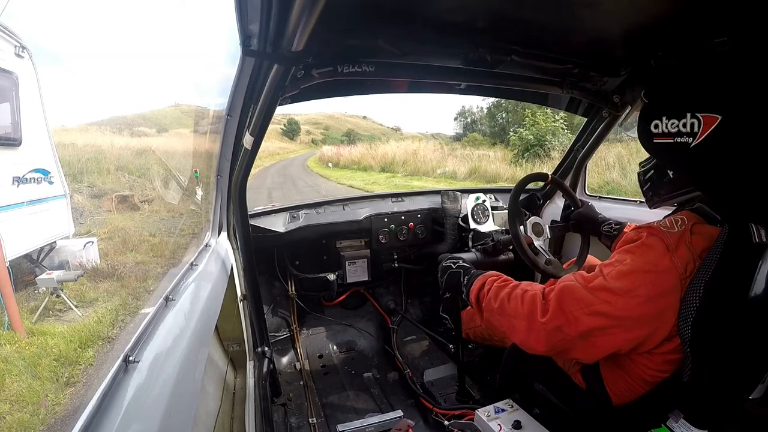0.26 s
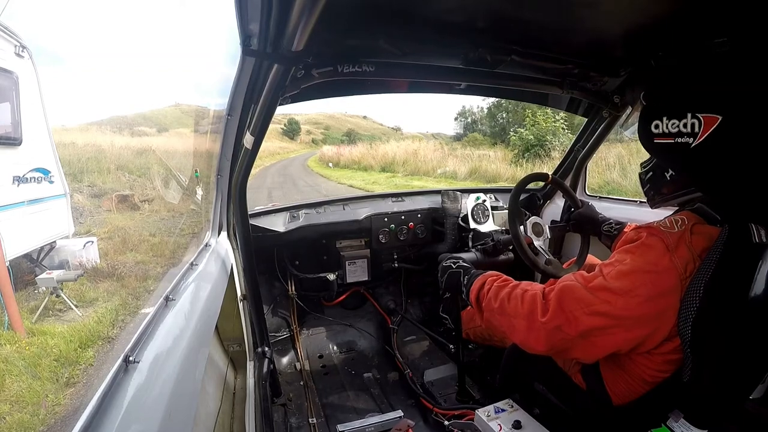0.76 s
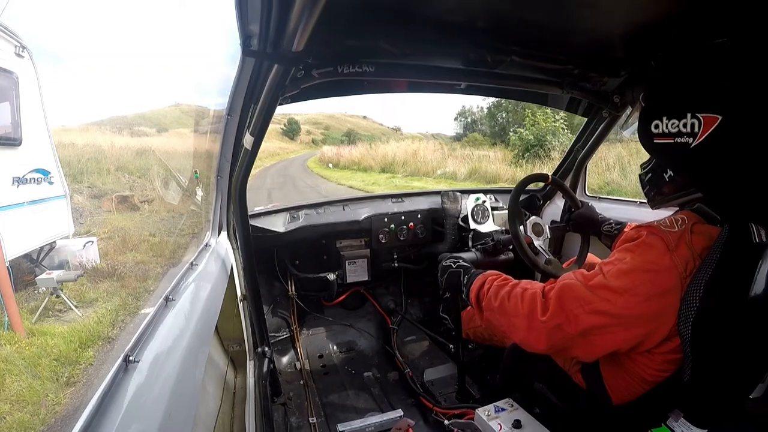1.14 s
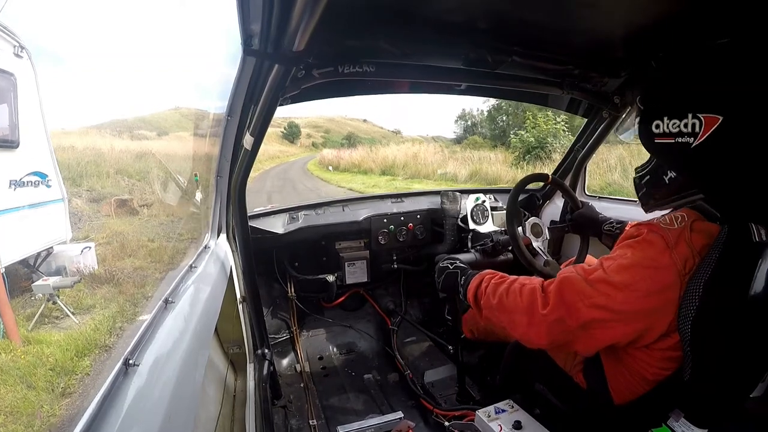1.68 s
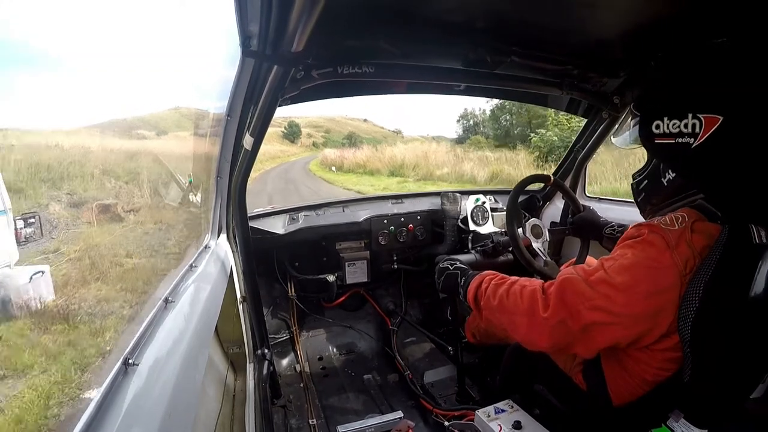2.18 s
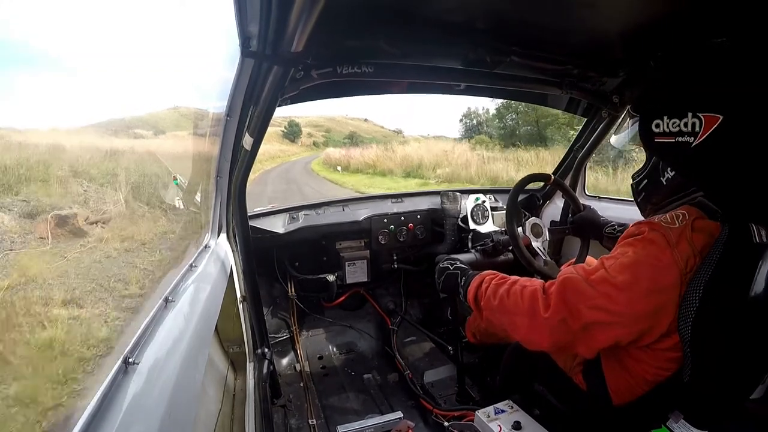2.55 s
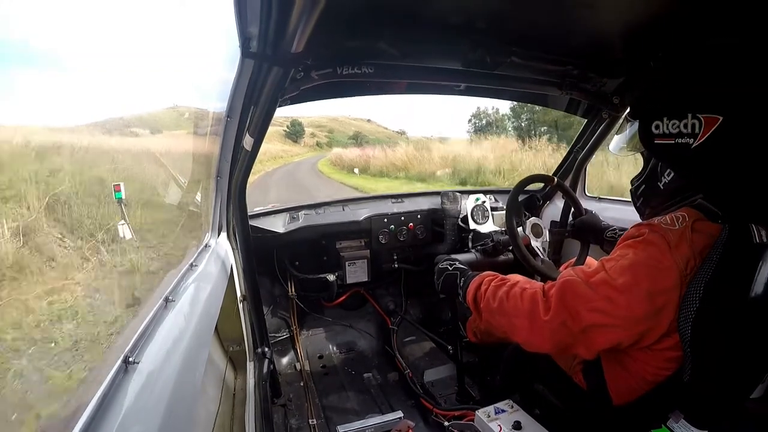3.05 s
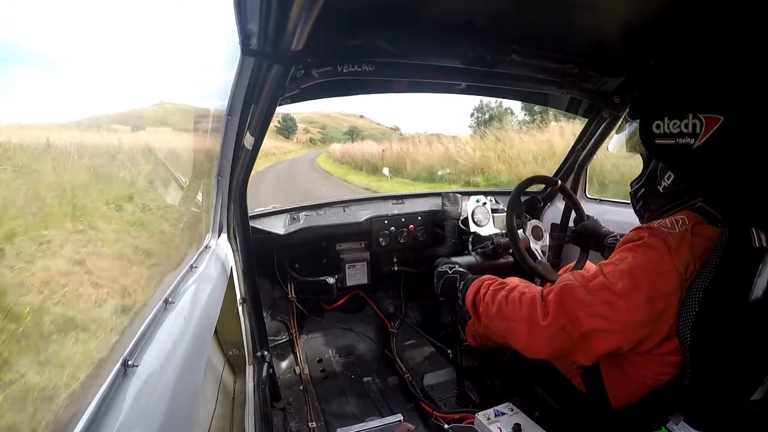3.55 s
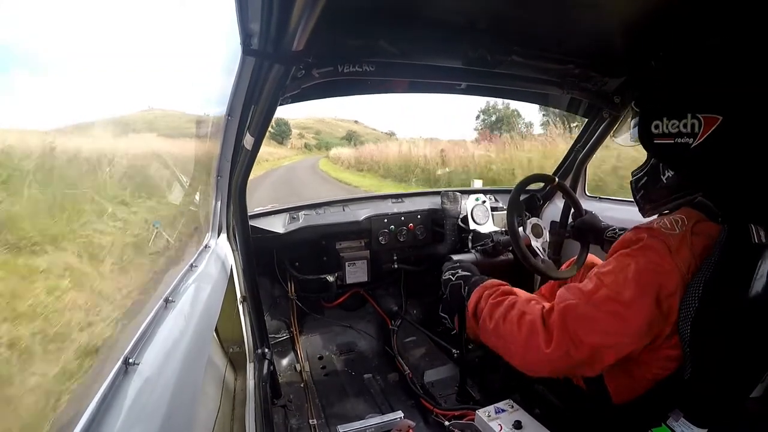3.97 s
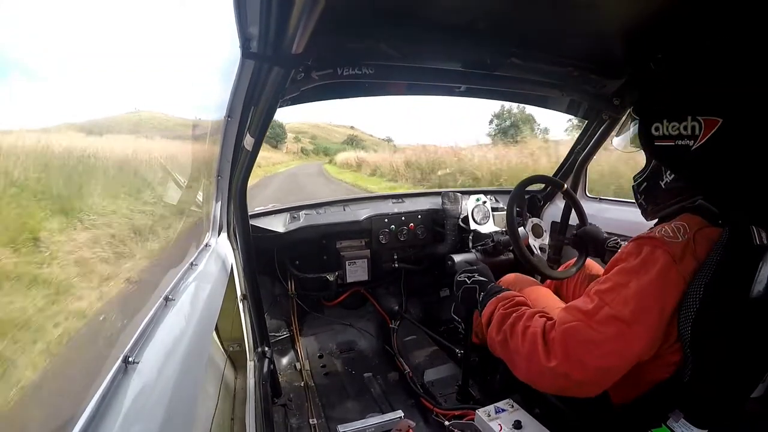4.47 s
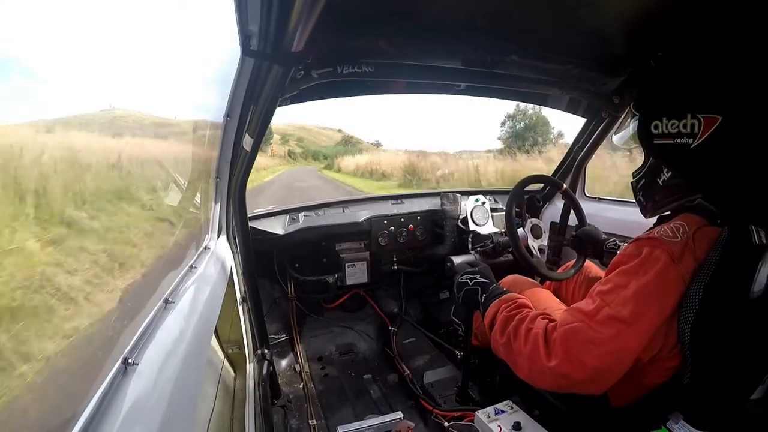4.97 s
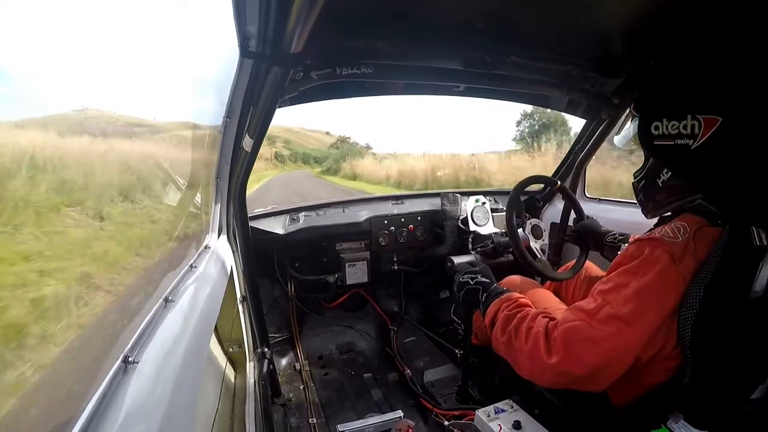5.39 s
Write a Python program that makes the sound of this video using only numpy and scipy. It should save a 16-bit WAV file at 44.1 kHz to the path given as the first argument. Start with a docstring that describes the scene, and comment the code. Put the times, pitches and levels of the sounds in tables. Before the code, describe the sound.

A race car engine revs twice, then launches and accelerates hard through one upshift, booming inside a bare cockpit with a buzzing panel.

```python
"""One microphone inside the bare cockpit of a four-cylinder race car, close to the steel panels.
Standing still, the driver blips the throttle twice and holds a rev; the firing note booms in the cabin
and a loose panel buzzes against the shell in bouts. At 3 s the car launches: the exhaust roar climbs
and the road shakes the body. Just after 4 s the revs fall for one upshift, the sound skips with
a sharp click and short thud, like an edit cut, and the engine pulls again."""
import sys
import numpy as np
from scipy import signal
from scipy.fft import rfft, irfft, next_fast_len
from scipy.io import wavfile
from scipy.ndimage import uniform_filter1d, map_coordinates

SR = 44100
rng = np.random.default_rng(int(sys.argv[2]) if len(sys.argv) > 2 else 0)


def inscribe(sig):
    """Save sig as 16-bit PCM at rate SR to the path in sys.argv[1].

    A 1-D sig is mono; a 2-D sig holds one channel per row.
    Samples are clipped to [-1, 1] before scaling.
    """
    pcm = np.round(np.clip(np.atleast_2d(sig).T, -1, 1) * 32767)
    wavfile.write(sys.argv[1], SR, pcm.astype(np.int16))


N = 248283

# Each row: time in seconds, firing rate in Hz.
FIRING_RATE = [(0, 103.9), (.1, 98.3), (.2, 85.6), (.3, 77.5), (.36, 85), (.41, 119.5), (.5, 143.1),
               (.56, 151.5), (.8, 122.5), (.9, 119), (1.0, 121.5), (1.2, 164.5), (1.3, 153.1), (1.6, 118.5),
               (1.7, 136.5), (1.8, 134), (1.9, 144.8), (2.04, 152), (2.2, 145.8), (2.47, 143.7),
               (2.8, 131.5), (3.0, 135), (3.18, 158.5), (3.3, 181.6), (3.6, 223.6), (3.7, 247.2),
               (3.8, 262.5), (3.9, 271.3), (4.03, 266), (4.1, 239.4), (4.2, 219.7), (4.3, 185.8),
               (4.345, 163.5), (4.55, 182), (5.1, 224), (5.3, 233.5), (5.63, 255.6)]
def crankshaft():
    """Running count of firings; the flywheel rounds off changes of speed over 20 ms."""
    return np.cumsum(uniform_filter1d(curves(FIRING_RATE)[0], size=round(.02 * SR))) / SR


# Each row: time in seconds, level of the firing note in dB before the cabin.
FIRING_LEVEL = [(0, -25), (.07, -7.5), (.33, -13), (.43, -32), (.475, -19.5), (.52, -25), (.66, -26.5),
                (.77, -37), (1.0, -32), (1.07, -24), (1.4, -25.5), (1.52, -39), (1.64, -35), (1.7, -29),
                (1.9, -24.5), (2.53, -27), (2.95, -29), (3.1, -23.5), (3.23, -26), (3.33, -29.5),
                (3.62, -23), (4.04, -20.5), (4.08, -31), (4.3, -24.5), (4.37, -24), (4.386, -25),
                (4.398, -35), (4.45, -29.5), (4.75, -20.5), (5.63, -22.5)]
# Brief dips of that note. Each row: time in seconds, depth in dB (negative lifts it).
FIRING_DIPS = [(0.219, 9), (.39, -8.5), (.92, 13), (1.741, 22), (2.591, 6), (2.79, 3.5), (3.645, 12),
               (4.255, 6), (5.15, 18), (5.32, 1)]
# The cabin's effect on a tone at the microphone. Each row: frequency in Hz, gain in dB.
CABIN_GAIN = [(80, 0.5), (100, -7.5), (120, 5.5), (135, 15.5), (150, 15.5), (166, 15), (182, 4), (212, 7.5),
              (222, 5), (229, -2), (235, 3), (239, 9), (244, 10), (268, 6), (290, -4), (312, -15.5),
              (345, -6.5), (400, -3), (430, -6.5), (450, -1.5), (466, -8.5), (475, -16.5), (490, -20),
              (560, -32), (600, -14), (620, -4), (645, 0), (670, -12), (700, -12), (735, -9), (765, -9),
              (790, 0), (825, -9), (855, -7), (900, -8.5), (950, -25), (1000, -4.5), (1050, -11),
              (1090, -20.5), (1125, -24.5), (1160, -22), (1200, -15.5), (1250, -2.5), (1300, -20),
              (1500, -26.5), (1900, -27)]
# The crank's once-a-turn tone. Each row: pitch in Hz, level in dB.
CRANK_TONE = [(40, -25), (50, -27), (60, -33), (66, -39), (75, -46.5), (90, -44), (105, -42.5),
              (120, -34.5), (130, -23.5), (136, -19.5)]
# Each row: multiple of the firing rate, offset from the roar in dB.
OVERTONES = [(2, 0.5), (2.25, -16.5), (2.5, -10.5), (3, -2), (3.25, -7), (3.5, 1), (3.75, -11), (4, -7),
             (4.25, -10.5), (4.5, -10.5), (5, -2), (5.5, -11.5), (6, -5), (7, -3.5)]
# Overtones rise as the engine pulls, sink as it runs free. Each row: time in seconds, gain in dB.
PULL_GAIN = [(0, 4.5), (.5, 0), (.62, -1), (.7, -24), (1.0, -16), (1.06, -3), (1.11, -14), (1.23, -12),
             (1.29, 5), (1.38, 1), (1.45, -17), (1.65, -6), (1.8, -6.5), (1.9, 5.5), (2.03, -12),
             (2.15, 1.5), (2.6, -2), (2.9, 1), (3.3, -2.5), (3.48, -3.5), (3.6, 3.5), (3.75, -13),
             (4.0, 5.5), (4.07, -14), (4.15, -11), (4.35, -3.5), (4.6, -2), (4.9, -2), (5.25, 0.5),
             (5.4, -10), (5.63, -7)]
# Tones between whole multiples grow as the wheels load the engine. Each row: time in seconds, gain in dB.
BETWEEN_GAIN = [(0, -8), (3.1, -11.5), (3.4, -7), (5.63, -4.5)]
def engine_note(cycles):
    """Nearly pure, slightly unsteady engine tones swell where they cross a cabin resonance."""
    rate = np.gradient(cycles) * SR
    dips_db = sum(depth * bell(s, width_s=.028) for s, depth in FIRING_DIPS)
    firing_db = curves(FIRING_LEVEL)[0] - dips_db + db_at(CABIN_GAIN, rate)
    upper_db = curves(ROAR_LEVEL)[0] + curves(PULL_GAIN)[0]
    between_db, = curves(BETWEEN_GAIN)
    orders = [(.5, db_at(CRANK_TONE, rate / 2), 3.6), (1, firing_db, 1)]  # multiple, dB, swing in dB
    for k, own_db in OVERTONES:
        db = upper_db + own_db + (k % 1 > 0) * between_db + db_at(CABIN_GAIN, k * rate)
        orders.append((k, db, 1.7))
    tones = np.zeros(N)
    for k, db, swing in orders:
        level = np.sqrt(2) * amp(db + swing * wobble(30))
        tones += level * np.sin(2 * np.pi * k * cycles + .18 * swing * wobble(25))
    return tones


# Each row: multiple of the firing rate, relative level in dB.
LOPE_TONES = [(.25, -5), (.75, 0), (1.25, 3), (1.5, -8)]
# The cabin's low end at the microphone. Each row: frequency in Hz, gain in dB.
CABIN_BASS = [(20, -17), (36, -10), (60, 1), (100, -9), (148, 3), (185, -11.5), (260, -17), (400, -34)]
def lope(cycles):
    """Unequal cylinders add tones at quarters of the firing rate, loud on a cabin resonance."""
    rate = np.gradient(cycles) * SR
    tones = np.zeros(N)
    for k, own_db in LOPE_TONES:
        level = amp(own_db + db_at(CABIN_BASS, k * rate) + .83 * wobble(13))
        tones += level * np.sin(2 * np.pi * k * cycles + .3 * wobble(10))
    _, _, lope_db = curves(RUMBLE_LEVELS)
    return amp(lope_db + 1.2 * wobble(12)) * tones


# The exhaust from inside the car. Each row: time in seconds, level in dB.
ROAR_LEVEL = [(0, -35.5), (.25, -37), (.46, -30.5), (.57, -39.5), (.75, -51), (.92, -57), (1.05, -41),
              (1.11, -36), (1.38, -41.5), (1.6, -51), (1.7, -35.5), (1.8, -42), (1.85, -38.5), (2.75, -43),
              (3.0, -36), (3.3, -34), (3.57, -29.5), (3.7, -24.5), (4.0, -25), (4.07, -28), (4.35, -33.5),
              (4.41, -29.5), (5.19, -23), (5.63, -25)]
# Each entry: strength of one cylinder's firing in dB.
CYLINDER_DB = [0, -10, -3, -12]
# Steady load lifts the pulses out of the gas noise. Each row: time in seconds, their share of the power.
PULSE_SHARE = [(0, .2), (.5, .1), (1.75, .1), (2, .25), (2.6, .2), (3.1, .25), (3.6, .35), (4.05, .35),
               (4.15, .1), (4.4, .25), (4.65, .5), (5.63, .5)]
# Colours of the pipe and the valve gear. Each row: frequency in Hz, relative gain in dB.
PIPE_COLOUR = [(140, -20.5), (230, -13), (276, -15), (311, -14), (448, -16.5), (547, -15), (807, -15),
               (1400, -22.5), (1860, -24), (4000, -37), (5200, -63.5), (8800, -120)]
HISS_COLOUR = [(880, -27.5), (1500, 1), (2060, -13), (2350, 0), (2940, -11.5), (3410, -10.5), (3740, -12.5),
               (3950, -4.5), (4200, -8), (4500, -6.5), (4960, -9), (10500, -20), (14000, -43.5)]
def exhaust(cycles):
    """Firing pulses and throbbing gas noise pass through pipe and shell; valve gear hisses above."""
    roar_db, = curves(ROAR_LEVEL)
    share, = curves(PULSE_SHARE)
    throb = 1 + .053 * np.cos(2 * np.pi * cycles)
    firing = pulses(cycles, jitter_s=4e-5, scatter_db=1.3, pattern_db=CYLINDER_DB)
    firing /= np.sqrt(np.gradient(cycles))  # equal power at any revs
    gas = throb * rng.standard_normal(N) * amp(2.1 * wobble(40))
    # the pulses reach the shell through its mounts and ring it harder than the airborne noise does
    blows = unit(shell(coloured(firing, PIPE_COLOUR), ringing=1.2))
    rush = unit(shell(coloured(gas, PIPE_COLOUR), ringing=.85))
    roar = amp(roar_db) * (np.sqrt(share) * blows + np.sqrt(1 - share) * rush)
    hiss = unit(coloured(throb * rng.standard_normal(N) * amp(1.2 * wobble(60)), HISS_COLOUR))
    hiss_level = np.hypot(amp(roar_db - 19), amp(-53))  # follows the roar down to an idle floor
    return roar + hiss_level * hiss


# Sheet steel all round the microphone. Each row: mode frequency in Hz, width in Hz, nominal lift in dB.
SHELL_MODES = [(455, 36, 7), (635, 36, 7), (790, 36, 8), (900, 36, 5), (995, 36, 7), (1090, 30, 7),
               (1155, 34, 5), (1240, 34, 7), (1332, 30, 7), (1460, 40, 4), (1616, 36, 7), (1812, 50, 7),
               (1945, 40, 7), (2300, 320, 6), (3400, 220, 8), (4450, 300, 8)]
# Reflections between the near panels. Each row: delay in seconds, feedback factor.
REFLECTIONS = [(.0013, .5), (.0029, .5), (.0047, 1.6), (.0071, 0.57)]
def shell(x, ringing):
    """The bare steel shell lifts its own modes; reflections smear each pulse without colouring it."""
    size = next_fast_len(N + SR // 2)
    f = np.fft.rfftfreq(size, 1 / SR)
    response = 1
    for hz, width, db in SHELL_MODES:
        mode = 1j * f * width / (hz * hz - f * f + 1j * f * width)
        response *= 1 + (amp(ringing * db) - 1) * mode
    for delay, feedback in REFLECTIONS:
        late = np.exp(-2j * np.pi * f * delay)
        response *= (late - feedback) / (1 - feedback * late)
    return irfft(rfft(x, size) * response, size)[:N]


# Single hard contacts of the panel. Each row: time in seconds, rough peak level in dB.
SLAPS = [(.4752, -22), (.4832, -19), (.4899, -27), (.4941, -23), (.4968, -24), (1.702, -36), (1.712, -34),
         (1.771, -39), (1.784, -40)]
# Colours of buzz and slap, heard close. Each row: frequency in Hz, relative gain in dB.
BUZZ_COLOUR = [(880, -31), (1500, -7), (1980, -14), (2150, -2), (2260, 1), (2340, 0.5), (2420, -2),
               (2520, -3.5), (2720, -12), (3060, -8), (3400, -14.5), (3900, -17), (4250, -13.5),
               (4550, -17.5), (5480, -17.5), (6190, -23.5), (9650, -27.5), (10700, -33), (11500, -75.5)]
SLAP_COLOUR = [(900, -28), (1800, -12), (2350, 2.5), (3000, 1.5), (5000, -8), (9500, -14), (14500, -32),
               (16000, -59)]
def loose_panel(cycles):
    """The panel strikes hard at one end of each swing, softer and duller at the other."""
    hard = pulses(cycles, jitter_s=1.2e-4, scatter_db=1.2, pattern_db=[0])
    soft = pulses(cycles + .5, jitter_s=2e-4, scatter_db=1.2, pattern_db=[-4])
    strikes = chatter(hard) + signal.lfilter(*signal.butter(2, 4630, fs=SR), chatter(soft))
    buzz = buzz_level() * unit(coloured(strikes, BUZZ_COLOUR))
    slaps = np.zeros(N)
    for s, db in SLAPS:
        slaps[round(s * SR)] = amp(db)
    slap_peak = np.abs(coloured(np.arange(N) == 0, SLAP_COLOUR)).max()
    return buzz + coloured(chatter(slaps), SLAP_COLOUR) / slap_peak


def chatter(contacts, t60_s=.009):
    """Each contact trails a brief chatter, thinner than the strike."""
    tails = signal.lfilter([1], [1, -amp(-60 / (t60_s * SR))], np.abs(contacts))
    thin = signal.lfilter(*signal.butter(1, 3200, "high", fs=SR), rng.standard_normal(N))
    return contacts + .1 * tails * thin


# Each row: start and end in seconds, first and last level in dB, brief offset at the onset in dB.
BUZZ_BOUTS = [(0.491, 0.739, -36, -43, -2), (1.061, 1.189, -33.5, -41, -3), (1.236, 1.48, -35, -43.5, -8),
              (1.811, 2.758, -35.5, -41.5, -0.5), (2.971, 3.18, -34.5, -41, -1)]
def buzz_level():
    """Each bout of buzz starts suddenly, holds, fades late and stops suddenly."""
    t, level = np.arange(N) / SR, np.zeros(N)
    for start, end, first_db, last_db, onset_db in BUZZ_BOUTS:
        fade = np.clip((t - start) / (end - start), 0, 1) ** 2
        onset = np.exp(-np.abs(t - start) / .051)
        level += ((t > start) & (t < end)) * amp(first_db + (last_db - first_db) * fade + onset_db * onset)
    return uniform_filter1d(level * amp(.4 * wobble(15)), size=200)


# Each row: start in seconds, level in dB, time to fall 60 dB in seconds.
CUT_CLICK = [(4.3833, -4, 0.03)]
# Each row: start in seconds, level in dB, pitch in Hz, time to fall 60 dB in seconds.
POPS = [(.415, -17, 806, 0.023), (.437, 1, 660, 0.0096), (.456, -11, 625, 0.059), (.478, -13, 411, 0.11),
        (1.716, -45, 6080, .05), (1.733, -43, 6000, .025), (3.855, -19, 830, .12)]
def cut_and_pops():
    """A sharp click and short thud, like an edit cut; short pops and pings ring earlier on."""
    out, t = np.zeros(N + SR), np.arange(SR // 10) / SR
    thud = amp(-15 - 60 * t / .022) * np.sin(2 * np.pi * 400 * t)
    for s, db, t60 in CUT_CLICK:
        click = amp(db - 60 * t / t60) * (1 - np.exp(-t / 1.5e-5))
        out[round(s * SR):][:len(t)] += click + thud
    for s, db, hz, t60 in POPS:
        envelope = amp(db - 60 * t / t60) * (1 - np.exp(-t / .002))
        out[round(s * SR):][:len(t)] += envelope * np.sin(2 * np.pi * hz * t)
    return out[:N]


# Each row: frequency in Hz, width in Hz, relative level in dB.
RASP_MODES = [(1320, 86, 2.5), (1530, 150, -0.5), (2430, 310, -5.5), (3370, 230, -11.5), (4300, 630, -16.5)]
# Each row: time in seconds, level in dB.
RASP_LEVEL = [(0, -44), (.18, -39.5), (.27, -54), (.4, -37), (.45, -40), (.53, -43), (.62, -64),
              (5.63, -89)]
def overrun_rasp():
    """A rough metallic edge while the engine runs down and catches again."""
    return amp(curves(RASP_LEVEL)[0] + 2.1 * wobble(60)) * resonant(RASP_MODES)


# Each row: time in seconds, then levels of body shake, cabin boom and engine lope in dB.
RUMBLE_LEVELS = [(0, -49, -23.5, -47), (.33, -28, -20, -38), (.45, -34, -10, -28), (.6, -44, -40, -40.5),
                 (1.1, -34, -43, -30), (1.3, -34, -36, -47), (1.5, -42, -35.5, -51), (1.9, -23, -24, -37),
                 (2.1, -31, -30, -45), (2.3, -36, -37, -47), (2.6, -29, -30, -39), (2.9, -19.5, -24, -40),
                 (3.5, -29.5, -24, -28), (3.7, -14.5, -27, -18.5), (4.4, -20, -26, -24),
                 (4.62, -17, -26, -26), (4.7, -16, -27, -17), (4.83, -18, -28, -13), (4.93, -21, -28, -15),
                 (5.02, -16, -27, -21), (5.2, -10.5, -17, -18), (5.63, -19, -25.5, -20)]
# Jolts through the body. Each row: time in seconds, shake in dB, boom in dB.
JOLTS = [(.41, -45, -18), (1.681, -46, -19.5), (1.749, -9.5, -9.5), (3.68, -9, -23), (3.86, -26, -12),
         (3.9, -21, -29), (3.95, -29, -16.5), (4.14, -33, -17.5), (4.19, -11.5, -26), (4.33, -18, -25),
         (4.52, -20, -16), (4.59, -10, -28), (4.95, -10.5, -23), (5.3, -12, -39), (5.4, -10, -23)]
# The body, and the air round the microphone. Each row: frequency in Hz, width in Hz, relative level in dB.
BODY_MODES = [(33.4, 13, 7), (60.3, 8.8, -4.5), (101, 32, -6.5)]
AIR_MODE = [(148.9, 21, 0)]
def road():
    """The body rocks and the cabin air booms at wandering pitches, swelling at random and on each jolt."""
    rolling = [amp(db + 3.5 * wobble(14)) for db in curves(RUMBLE_LEVELS)[:2]]
    humps = sum(amp(dbs)[:, None] * bell(s, width_s=.036) for s, *dbs in JOLTS)
    shake, boom = np.hypot(rolling, humps)
    rocking = np.sqrt(2) * np.sin(2 * np.pi * np.cumsum(34 + 2.59 * wobble(5.4)) / SR)
    drone = np.sqrt(2) * np.sin(2 * np.pi * np.cumsum(150 + 6 * wobble(7.3)) / SR)
    body = .6 * rocking + .23 * resonant(BODY_MODES)
    air = .35 * drone + .84 * resonant(AIR_MODE)
    return shake * body + boom * air


# Each row: frequency in Hz, relative gain in dB.
HUM_COLOUR = [(60, -18.5), (180, -0.5), (300, 1), (550, -5), (900, -9), (2000, -39.5), (6000, -100)]
def cabin_hum():
    """Steady low noise fills the cockpit behind everything else."""
    return amp(-44) * unit(coloured(rng.standard_normal(N), HUM_COLOUR))


def pulses(cycles, jitter_s, scatter_db, pattern_db):
    """One impulse each time the cycle count passes a whole number, placed between samples."""
    k = np.arange(1, int(cycles[-1]))
    chance = rng.standard_normal((len(k), 2))
    at = np.interp(k, cycles, np.arange(N)) + jitter_s * SR * chance[:, 0]
    size = amp(scatter_db * chance[:, 1] + np.take(pattern_db, k, mode="wrap"))
    taps = np.clip(np.floor(at)[:, None] + np.arange(-7, 9), 0, N - 1)
    offset = taps - at[:, None]
    shape = np.sinc(offset) * np.cos(np.pi * offset / 16) ** 2
    return np.bincount(taps.astype(int).ravel(), (size[:, None] * shape).ravel(), N)


def coloured(x, points):
    """x through the causal filter with the (Hz, dB) points as its gain."""
    size = next_fast_len(N + SR // 2)
    hz, db = np.transpose(points)
    gain = amp(np.interp(np.log(np.fft.rfftfreq(size, 1 / SR) + 1), np.log(hz + 1), db))
    cepstrum = irfft(np.log(gain + 1e-6), size)
    cepstrum[1:size // 2] *= 2  # folded for minimum phase
    cepstrum[size // 2 + 1:] = 0
    return irfft(rfft(x, size) * np.exp(rfft(cepstrum)), size)[:N]


def resonant(modes):
    """Noise ringing in (Hz, width, dB) modes, each a steep double resonance; rms 1."""
    f = np.fft.rfftfreq(N, 1 / SR)
    gain = sum(amp(db) * (f * w) ** 2 / ((hz * hz - f * f) ** 2 + (f * w) ** 2) for hz, w, db in modes)
    return unit(irfft(rfft(rng.standard_normal(N)) * gain, N))


def curves(rows):
    """One value per sample for each column after the time."""
    s, *columns = np.transpose(rows)
    return [np.interp(np.arange(N) / SR, s, column) for column in columns]


def db_at(points, hz):
    """Read (Hz, dB) points along a log frequency axis."""
    knots_hz, db = np.transpose(points)
    return np.interp(np.log(hz), np.log(knots_hz), db)


def wobble(rate):
    """A smooth random curve, rate knots a second."""
    return map_coordinates(rng.standard_normal(int(N * rate / SR) + 4), [np.arange(N) * rate / SR])


def bell(s, width_s):
    """A smooth hump of height 1 around time s."""
    return np.exp(-((np.arange(N) / SR - s) / width_s) ** 2)


def amp(db):
    """Gain of a level in dB."""
    return 10 ** (np.asarray(db) / 20)


def unit(x):
    """x at rms 1."""
    return x / np.sqrt(np.mean(x ** 2) + 1e-20)


def scene():
    """The cockpit in mono; one count of firings drives the engine and the panel."""
    cycles = crankshaft()
    engine = engine_note(cycles) + lope(cycles) + exhaust(cycles) + overrun_rasp()
    return (engine + loose_panel(cycles) + road() + cabin_hum() + cut_and_pops())[None]


def record(dry, ceiling=.86, top_hz=17000):
    """The highest peaks are rounded off and the treble stops at 17 kHz."""
    soft = dry / (1 + np.abs(dry / ceiling) ** 6) ** (1 / 6)
    return signal.sosfilt(signal.ellip(12, .1, 90, top_hz, fs=SR, output="sos"), soft)


dry = scene()
out = record(dry)
inscribe(out)
```